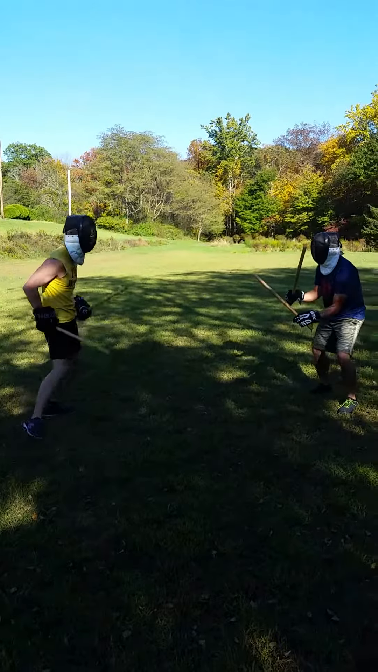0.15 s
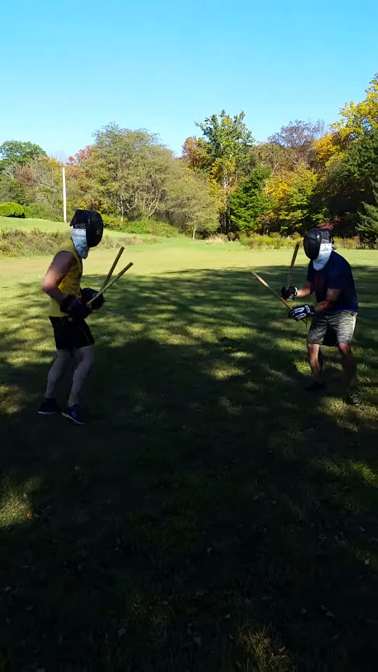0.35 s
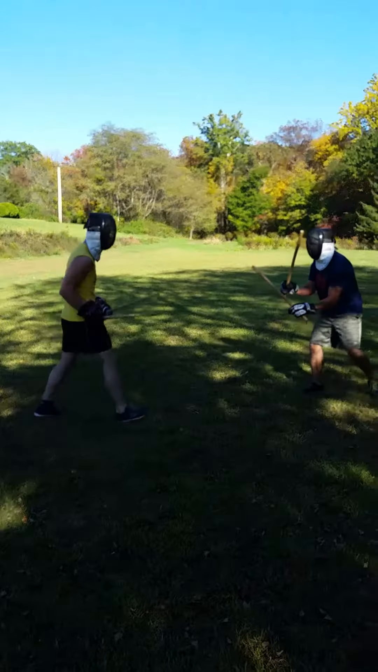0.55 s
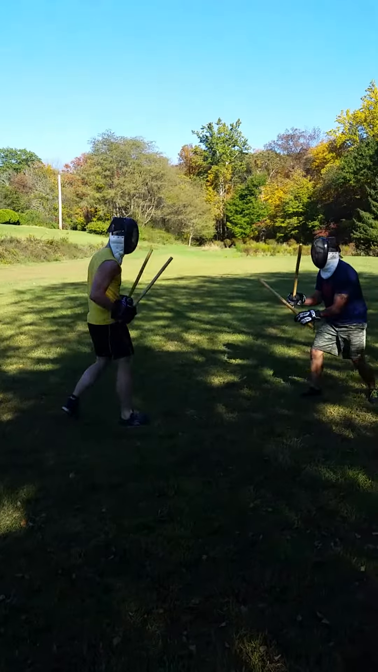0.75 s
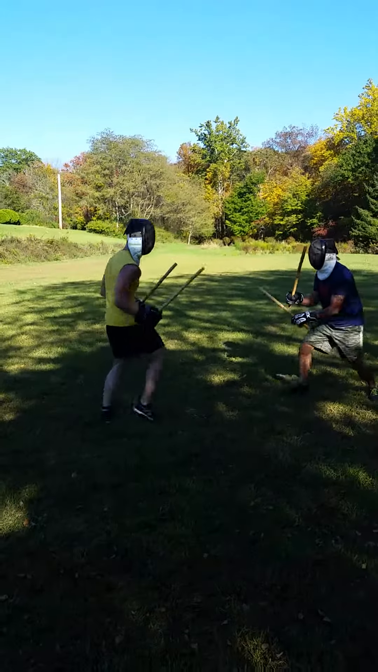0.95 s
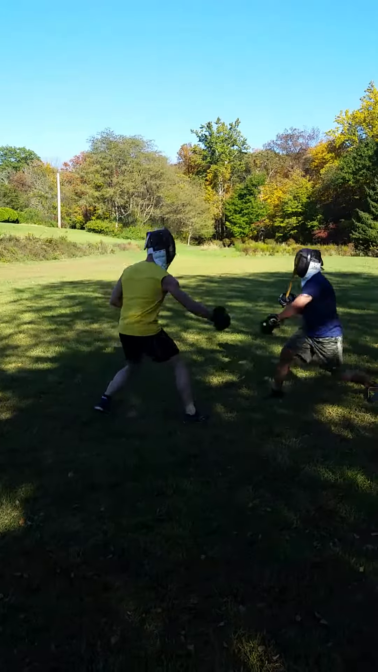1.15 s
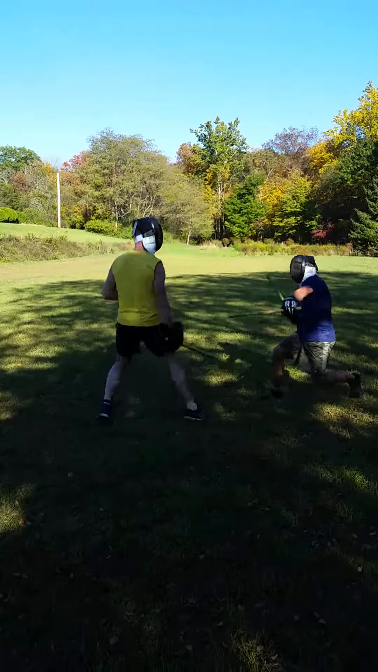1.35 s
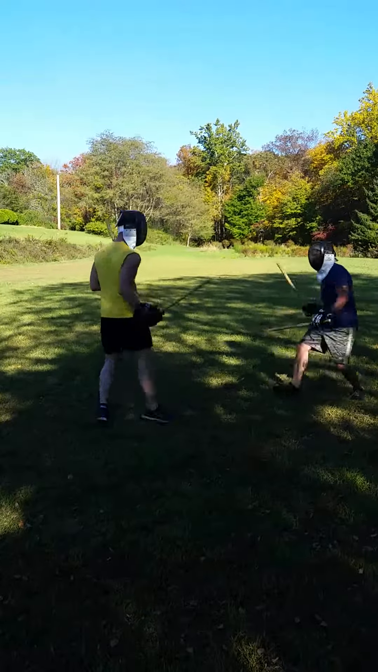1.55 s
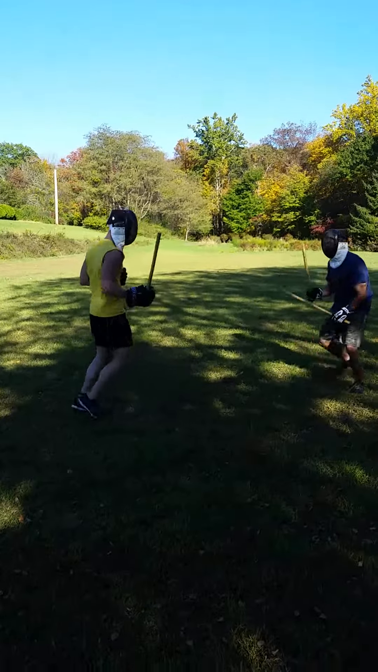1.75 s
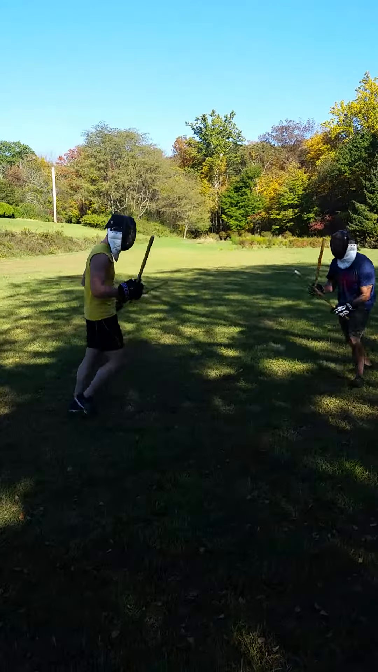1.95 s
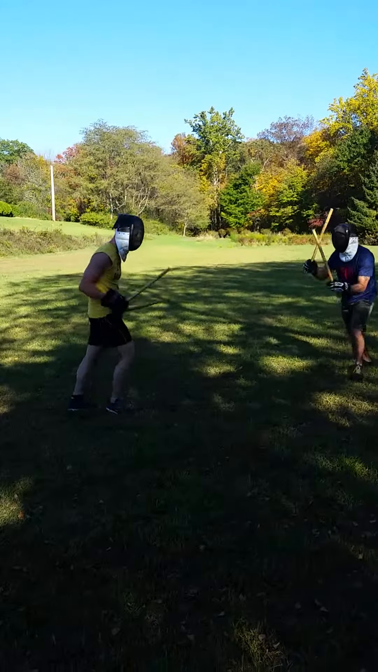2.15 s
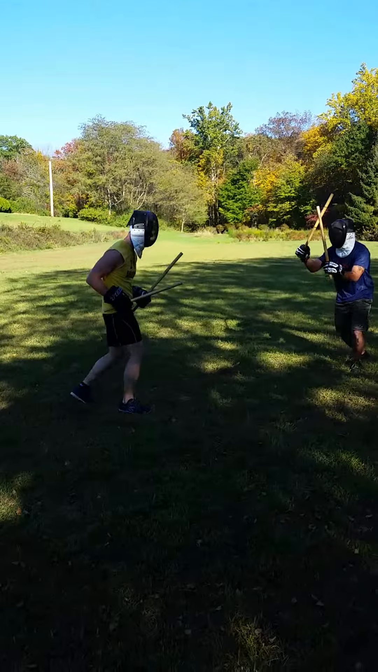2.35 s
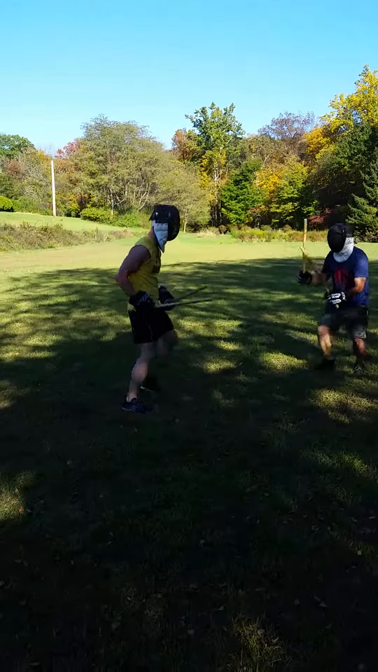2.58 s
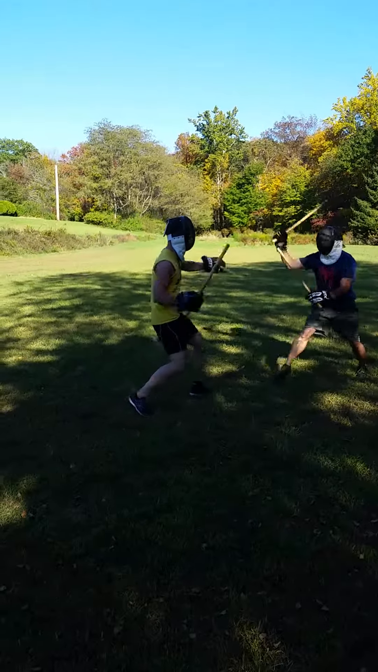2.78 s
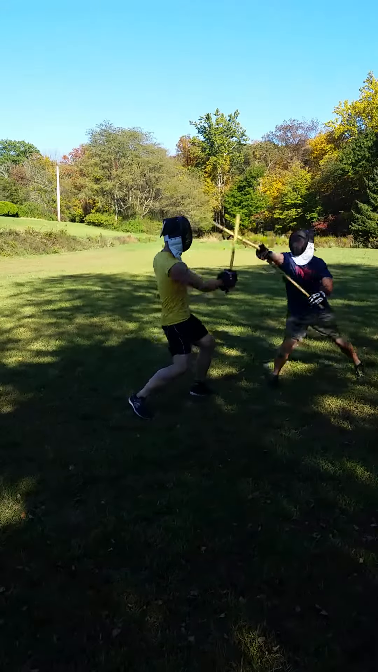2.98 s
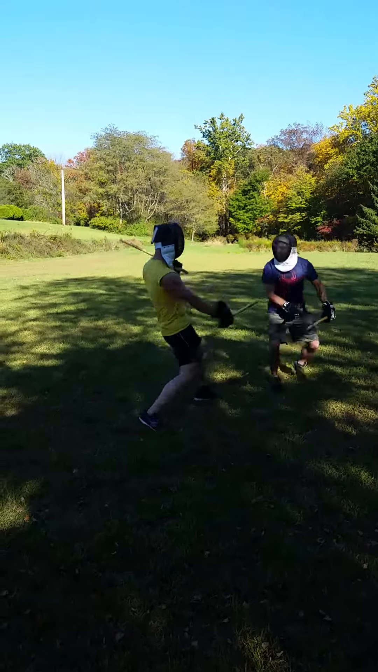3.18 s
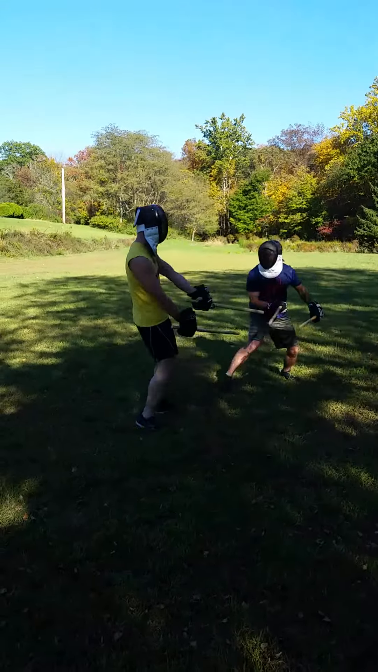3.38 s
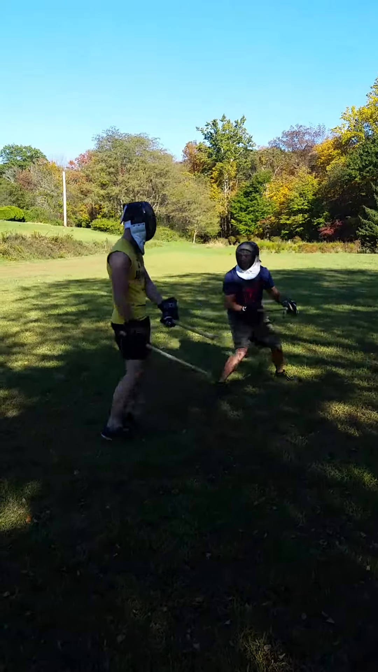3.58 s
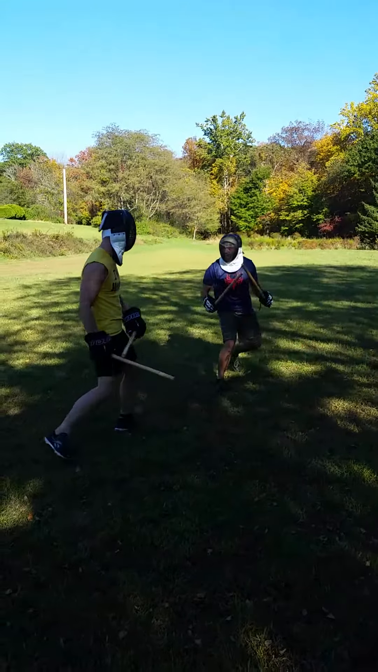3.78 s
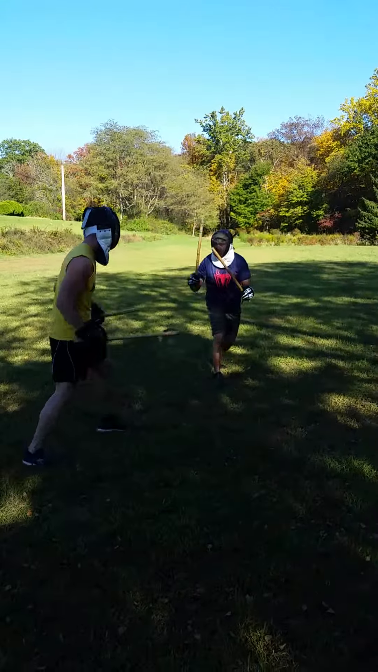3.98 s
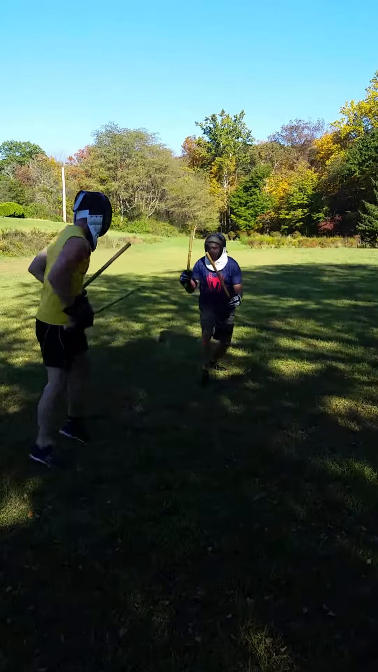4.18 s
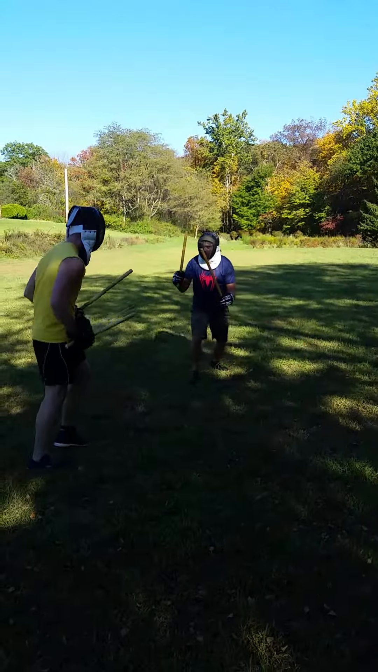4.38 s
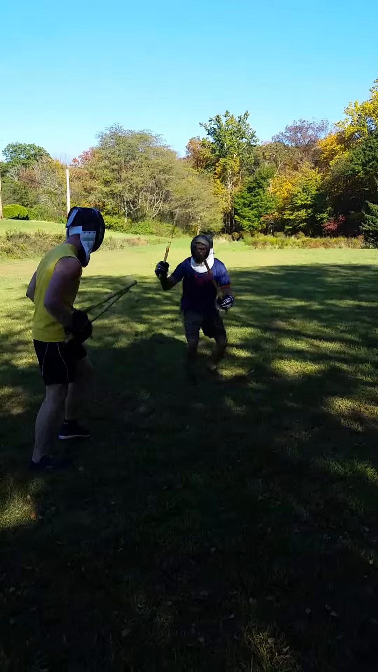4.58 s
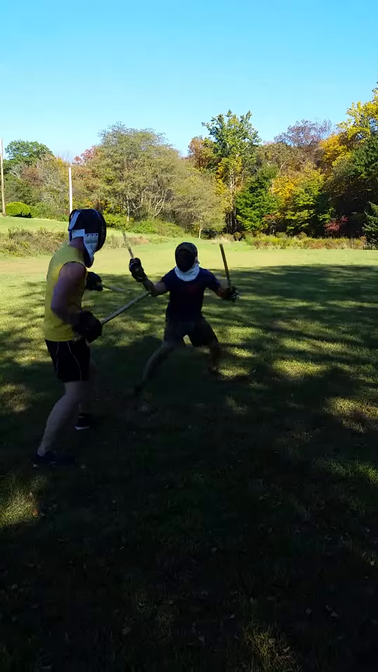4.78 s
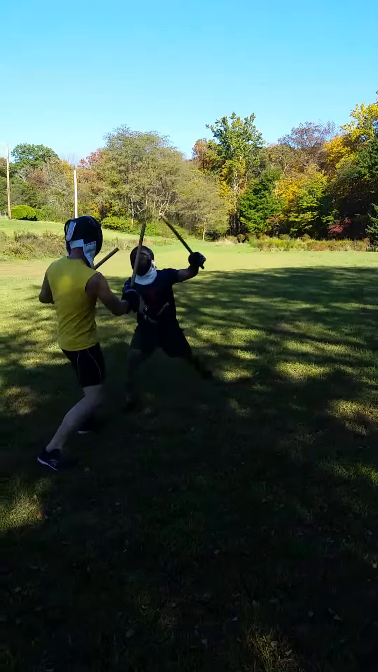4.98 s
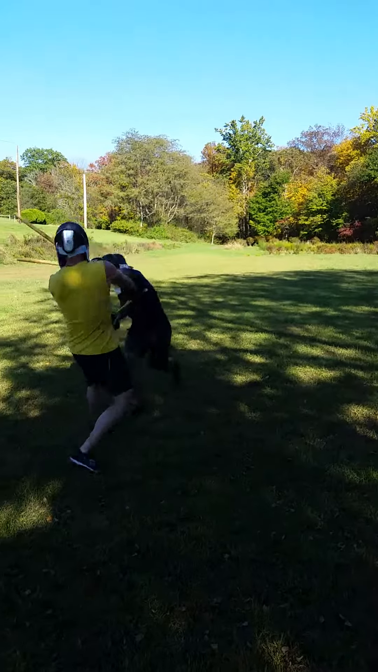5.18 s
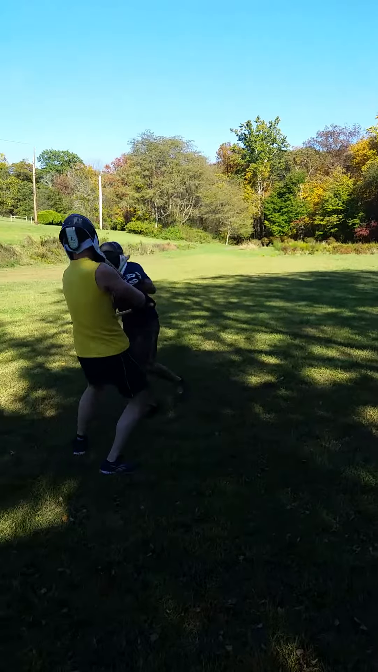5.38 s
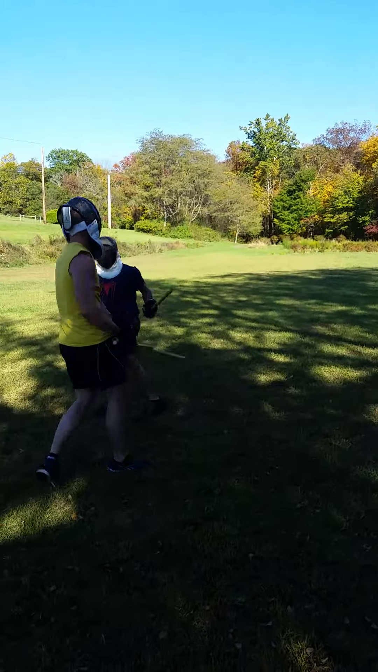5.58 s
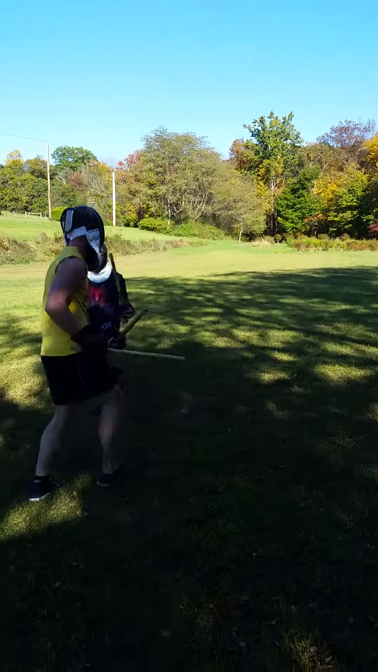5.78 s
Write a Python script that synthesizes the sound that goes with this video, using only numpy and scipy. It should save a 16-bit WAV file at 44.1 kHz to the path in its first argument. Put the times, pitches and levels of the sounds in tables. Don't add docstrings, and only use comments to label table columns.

```python
import sys
import numpy as np
from scipy import signal
from scipy.fft import rfft, irfft
from scipy.io import wavfile
from scipy.ndimage import uniform_filter1d

SR = 44100
rng = np.random.default_rng(int(sys.argv[2]) if len(sys.argv) > 2 else 0)


def gain_from_db(level_db):
    decades = np.asarray(level_db, float) / 20
    return 10 ** decades


def unload_wav(signal):
    wavfile.write(
        sys.argv[1],
        SR,
        np.round(np.clip(np.atleast_2d(signal).T, -1, 1) * 32767).astype(np.int16),
    )


N = 257544

# start_s, level_db, tilt_db_per_octave (hardness), favoured_hz (place of contact), near_echo_db
STICK_BLOWS = [
    (1.288, -11.5, -0.1, 3770, -13.5),
    (3.133, -25.5, 0.5, 4420, -19),
    (4.982, -12.5, -1.1, 2300, -9),
    (5.011, -15.5, -0.5, 3920, -7),
    (5.191, -23.5, 0.5, 1330, -12),
    (5.281, -16.5, -1.4, 3900, -14),
    (5.433, -19, -1.5, 704, -18),
]
LONG_STICK_BLOWS = [
    (3.093, -13.5, 1.5, 1170, -9),
    (3.474, -16.5, -2, 2240, -18),
    (4.707, -29, -6.5, 1360, -22),
    (5.311, -29.5, -2.5, 1620, -24),
]
GLOVE_BLOWS = [
    (1.332, -15.5, 0.89, 730, -23.5),
    (1.397, -30.5, -1.1, 1700, -12),
]
# start_s, level_db, snap_db, rise_ms, pitch_factor (on TOUCH_MODES)
TOUCHES = [
    (0.986, -47.5, -17, 1.1, 0.52),
    (1.208, -58, -2, .7, 0.95),
    (2.944, -48.5, -8, 0.3, 1.42),
    (3.529, -39.5, -36, 2.4, 1.02),
    (3.925, -49.5, -23.5, 0.74, 1.02),
    (4.05, -66, -15, 0.55, 1.4),
    (4.686, -41.5, -19, 1.7, 0.38),
    (5.042, -33, -26, 0.7, 0.79),
]
# pitch_hz, width_hz, level_db
STICK_MODES = [(230, 68, -21), (695, 67, -3), (1200, 110, -2.5), (1658, 200, -0.5), (2233, 120, 0.5),
               (2890, 100, -2), (3380, 250, -9.5), (3840, 54, -3.5), (4390, 110, -8), (4568, 120, -10.5),
               (5135, 130, -12.5), (5815, 100, -15)]
LONG_STICK_MODES = [(634, 68, -10), (1070, 91, -5.5), (1620, 58, -3), (2300, 280, -11.5), (2870, 140, -4),
                    (3110, 110, -5), (3730, 160, -4), (4350, 190, -7.5), (5080, 100, -5), (5930, 89, -14),
                    (7100, 95, -15.5)]
GLOVE_MODES = [(228, 44, -4.5), (728, 85, -2.5), (1247, 110, -6), (1700, 150, -14.5), (2320, 200, -12.5),
               (3150, 130, -16), (4150, 600, -11.5)]
TOUCH_MODES = [(1190, 130, 9), (1590, 460, -11), (2040, 95, 12), (3100, 350, 8), (4000, 69, -0.5),
               (5100, 990, -8)]
# pitch_hz, level_db
CONTACT_NOISE = [(200, -16), (1000, -2.5), (4000, 9), (8500, 2.5), (10000, -13.5), (15800, -14.5),
                 (16500, -34.5)]
# pitch_hz, t60_s
TREE_DECAY = [(300, 0.88), (1000, 1), (2200, 1), (4000, 0.89), (8000, 0.78)]
# pitch_hz, level_db
NEAR_TREES = [(150, -27.5), (500, -7.5), (2000, -3.5), (4500, -1.5), (9000, -20), (16000, -43)]
FAR_TREES = [(150, -18), (700, -5.5), (2200, -2), (4000, -7.5), (6000, -18), (16000, -41)]
# start_s, length_s, level_db, centre_hz, spread_octaves
SCUFFS = [(0.611, .2, -56.5, 1093, 0.12), (0.0, 0.3, -55.5, 1070, 0.88), (0.958, .05, -57.5, 1190, 2.15),
          (1.148, 0.098, -62, 4710, 0.92), (2.28, 0.11, -65.5, 5960, 1.74), (2.285, .18, -61, 1345, 0.3),
          (2.685, 0.28, -58.5, 5200, 1.04), (2.746, 0.14, -44.5, 770, 0.9),
          (3.698, 0.23, -65.5, 8000, 0.58), (4.642, 0.15, -57.5, 1000, 1.9), (5.434, 0.13, -54, 5240, 0.58),
          (5.555, 0.3, -54, 1160, 0.57)]
# start_s, peak_db, pitch_hz, t60_s,
# edge_db
LEFT_THUMPS = [(0.768, -33.5, 54.5, 0.084, -4), (1.005, -38, 71, 0.13, -23), (1.235, -32.5, 117, 0.2, -34),
               (2.2, -32, 112, .08, -11.5), (3.094, -32.5, 337, 0.055, -28.5),
               (3.475, -31, 337, 0.042, -37), (4.69, -39.5, 72, 0.082, -30), (4.98, -14, 350, 0.03, -33),
               (5.065, -21, 93, 0.043, -23), (5.191, -25.5, 266, 0.046, -4), (5.288, -20.5, 245, 0.025, -3),
               (5.445, -27.5, 230, 0.06, -20)]
RIGHT_PUSHES = [
    (0.975, -23.5, 91.4, 0.13, -41),
    (1.398, -22.5, 92, 0.027, -1),
    (2.128, -17.5, 73.4, 0.14, -45),
    (2.2, 0.5, 65.5, 0.11, -1),
    (2.69, -19.5, 104, 0.074, -24),
    (3.556, -22.5, 84, 0.21, -24),
    (3.572, -16, 85, 0.12, -1.5),
    (5.289, -17.5, 123.6, 0.069, -25),
    (5.365, -28.5, 112, 0.15, -22),
]
RIGHT_PULLS = [
    (5.3155, -8.5, 90, 0.083, -14.5),
    (5.4535, -5, 97, 0.073, -53),
]
# time_s, level_db
GUSTS = [(0.0, -43.5), (0.99, -40), (1.22, -45.5), (1.59, -43), (1.87, -48.5), (2.41, -41.5), (2.98, -39),
         (3.43, -49.5), (4.13, -45.5), (4.28, -38), (4.63, -35), (5.3, -42), (5.59, -44), (5.84, -43)]
# pitch_hz, level_db
WIND = [(10, -4.5), (30, 4.5), (70, 6.5), (110, -1.5), (200, -25.5), (300, -39), (600, -73.5)]
COVER = [(100, -7.5), (300, -6), (480, -18), (800, -9.5), (1500, -22), (2500, -23.5), (4000, -40.5),
         (6000, -55.5), (16000, -53.5)]
# start_s, length_s, pitch_hz, pulses_per_s, level_db
NEAR_INSECT = (4.3, .46, 4040, 33.3, -55)
# pitch_hz, width_hz, level_db
INSECTS = [(3987, 710, -54), (4330, 1100, -60), (8000, 880, -69.5)]
# pitch_hz, level_db
BREEZE = [(20, -35.5), (60, -38.5), (110, -40.5), (200, -44), (500, -48.5), (1000, -53.5), (2000, -60),
          (2900, -65), (6000, -71), (8000, -69), (10000, -81)]
# time_s, level_db
ENGINE_FADE = [(0, 4.5), (2.8, 2), (3.3, 2), (5.84, -3.5)]
# pitch_hz, level_db
HISS = [(20, -47), (300, -45.5), (1000, -56), (2000, -63), (4000, -71.5), (6500, -85), (10000, -82),
        (12000, -72.5), (15700, -68.5), (16050, -100)]
# time_s, level_db
GAIN = [(0.0, -77.5), (0.86, -85), (1.19, -78), (2.08, -84), (2.83, -80), (3.03, -80), (3.25, -92.5),
        (4.1, -91), (4.26, -87), (4.39, -86), (4.91, -80.5), (5.27, -83.5), (5.51, -81.5), (5.84, -83)]


def evened(x):
    return x / np.sqrt(np.mean(x ** 2) + 1e-20)


def read(points, hz):
    f, value = np.transpose(points)
    return np.interp(np.log(hz + 1), np.log(f + 1), value)


def curve(table):
    time_s, level_db = np.transpose(table)
    return np.interp(np.arange(N) / SR, time_s, level_db)


def add(mix, start_s, sound):
    part = mix[round(start_s * SR):][:len(sound)]
    part += sound[:len(part)]


def decay(t, t60_s):
    return gain_from_db(-60 * t / t60_s)


def rise(t, rise_s):
    return 1 - np.exp(-t / rise_s)


def colour(x, points, size=4096):
    log_gain = np.log(gain_from_db(read(points, abs(np.fft.fftfreq(size, 1 / SR)))))
    taps = np.fft.ifft(np.exp(np.conj(signal.hilbert(log_gain)))).real
    return signal.oaconvolve(x, taps[:size // 2])[:len(x)]


def wander(rate_hz):
    hz = np.fft.rfftfreq(N, 1 / SR)
    return evened(irfft(rfft(rng.standard_normal(N)) / (1 + (hz / rate_hz) ** 4), N))


def patches(shape, bands, frames):
    across = uniform_filter1d(rng.standard_normal(shape), size=bands, axis=0)
    return evened(uniform_filter1d(across, size=frames, axis=1))


def noise(points, patchy_db):
    hz, t, z = signal.stft(rng.standard_normal(N), SR, nperseg=1024)
    z = z * gain_from_db(patchy_db * patches(z.shape, 14, 6))
    return colour(signal.istft(z, SR, nperseg=1024)[1][:N], points)


def crack(blow_db, snap_db, rise_ms, modes, phases):
    t = np.arange(2600) / SR
    slow = max(rise_ms / 1000, 1e-4)
    ring = np.zeros(len(t))
    for (hz, width_hz, db), phase in zip(modes, phases):
        width_hz = np.clip(width_hz, 120, 700)
        ring += gain_from_db(db) * np.exp(-np.pi * width_hz * t) * np.sin(2 * np.pi * (hz * t + phase))
    ring = ring * rise(t, slow)
    chatter = rng.standard_normal(400) * (rng.random(400) < .03) * gain_from_db(-9.5) * decay(t[:400], 0.045)
    ring = signal.oaconvolve(ring, np.r_[1, chatter])[:len(t)]
    ring = ring / abs(ring).max()

    quick = max(rise_ms / 2000, 1e-4)
    snap = colour(rng.standard_normal(len(t)) * decay(t, 0.025) * rise(t, quick), CONTACT_NOISE)
    body = [(150, -29)] + [(hz, db) for hz, width_hz, db in modes] + [(7500, -34.5)]
    fill = colour(rng.standard_normal(len(t)) * decay(t, 0.047) * rise(t, slow), body)
    fill = fill / abs(fill).max()
    return gain_from_db(blow_db + 5.0) * (ring + gain_from_db(-8.5) * fill + gain_from_db(snap_db + 5.5) * snap)


def trees(points, start_s, swell_s):
    hz, t, z = signal.stft(rng.standard_normal(SR), SR, nperseg=256)
    bushes_db = 2.6 * patches(z.shape, 9, 5)
    z = z * gain_from_db(bushes_db) * decay(t, read(TREE_DECAY, hz)[:, None])
    tail = signal.istft(z, SR, nperseg=256)[1][:SR]
    swell = np.clip((np.arange(SR) / SR - start_s) / swell_s, .05, 1) ** 1.15
    tail = colour(tail * swell, points)
    return tail / np.linalg.norm(tail)


def echoes(near, near_db):
    far_db = -21 + 0.27 * (near_db + 13.5)
    return gain_from_db(near_db + 5.0) * near + gain_from_db(far_db) * trees(FAR_TREES, 0.017, 0.2)


def blows(table, body):
    out = np.zeros(N)
    hz, width_hz, mode_db = np.transpose(body)
    chances = rng.random((len(table), 2, len(body)))
    for (start_s, level_db, tilt, favoured_hz, near_db), (phases, grip) in zip(table, chances):
        favour_db = 7.5 * np.exp(-(np.log2(hz / favoured_hz) / 0.3) ** 2)
        tilt_db = tilt * np.log2(hz / 2010)
        modes = list(zip(hz, width_hz, mode_db + favour_db + tilt_db - 1.5 * grip))
        rise_ms = 0.48 * gain_from_db(0.9 * max(-16.5 - level_db, 0))
        blow = crack(level_db, -20.5 + 1.25 * tilt, rise_ms, modes, phases)
        near = trees(NEAR_TREES, 0.0095, 0.036) * decay(np.arange(SR) / SR, 0.52)
        add(out, start_s, blow)
        add(out, start_s, np.linalg.norm(blow) * echoes(near, near_db))
    return out


def touches():
    out = np.zeros(N)
    chances = rng.random((len(TOUCHES), 10))
    for (start_s, level_db, snap_db, rise_ms, pitch), phases in zip(TOUCHES, chances):
        modes = np.multiply(TOUCH_MODES, [pitch, 1, 1])
        add(out, start_s, crack(level_db, snap_db, rise_ms, modes, phases))
    return out


def sticks():
    hard = blows(STICK_BLOWS, STICK_MODES) + blows(LONG_STICK_BLOWS, LONG_STICK_MODES)
    return hard + blows(GLOVE_BLOWS, GLOVE_MODES) + touches()


def scuffs():
    out, hz = np.zeros(N), np.geomspace(50, 20000, num=120)
    for start_s, length_s, level_db, centre_hz, octaves in SCUFFS:
        count = round(length_s * SR)
        grains = rng.standard_normal(20000) * gain_from_db(2.0 * rng.exponential(1, 20000))
        band_db = np.maximum(-6 * (np.log2(hz / centre_hz) / octaves) ** 2, -60)
        rubbing = evened(colour(grains, np.c_[hz, band_db])[-count:])
        stroke = np.interp(np.linspace(0, 1, count), [0, 0.33, 1], [0, 1, 0])
        add(out, start_s, gain_from_db(level_db) * rubbing * np.sin(np.pi / 2 * stroke) ** 2)
    return out


def thumps(table):
    out, t = np.zeros(N), np.arange(9000) / SR
    for start_s, peak_db, hz, t60_s, edge_db in table:
        turns = hz * (t + 0.0048 * rise(t, 0.0014))
        ring = np.sin(2 * np.pi * turns) * decay(t, t60_s) * rise(t, 0.006)
        edge = gain_from_db(edge_db) * np.sin(2 * np.pi * 165 * t) * decay(t, 0.033) * rise(t, 0.0043)
        add(out, start_s - .0006, gain_from_db(peak_db + 2.5) * (ring + edge))
    return signal.sosfilt(signal.butter(2, 800, fs=SR, output="sos"), out)


def wind_rumble():
    return evened(noise(WIND, 2.4)) * gain_from_db(curve(GUSTS) + 9.5 + 2.2 * wander(21.6))


def singer():
    start_s, length_s, hz, rate, level_db = NEAR_INSECT
    t = np.arange(N) / SR - start_s
    swell = np.sin(np.pi * np.clip(t / length_s, 0, 1)) ** .6
    pulses = np.sin(np.pi * (rate * t - 0.17 + 0.04 * wander(12))) ** 4
    loudness = gain_from_db(level_db + 1.5 * wander(30))
    whistle = np.sin(2 * np.pi * np.cumsum(hz + 35 * wander(68)) / SR)
    return loudness * swell * pulses * whistle


def insects():
    hz = np.geomspace(2000, 12000, num=200)
    bands = sum(gain_from_db(db) / (1 + (2 * (hz - f_hz) / width_hz) ** 2) for f_hz, width_hz, db in INSECTS)
    return noise(np.c_[hz, 20 * np.log10(bands)], 0.55) * gain_from_db(4.5 + 1.1 * wander(60))


def breeze():
    return noise(BREEZE, 1.0) * gain_from_db(1.5)


def engine_hum():
    waver_db, waver_hz = 1.5 * wander(7), 3 * wander(8)
    return gain_from_db(-56 + curve(ENGINE_FADE) + waver_db) * np.sin(2 * np.pi * np.cumsum(127 + waver_hz) / SR)


def scene():
    ride_db = curve(GAIN) + 81
    gain = gain_from_db(ride_db)
    air = sticks() + scuffs() + singer()
    air += breeze() * gain_from_db(0.6 * ride_db) + insects() * gain_from_db(1.14 * ride_db)
    wind = wind_rumble()
    hum = engine_hum()
    left_hiss = gain_from_db(1.5) * noise([(8000, -99.0)] + HISS[-4:], 1.2)
    left = air + gain * (hum + left_hiss) + thumps(LEFT_THUMPS) + gain_from_db(-43.0) * wind
    right = colour(air, COVER) + gain * noise(HISS, 0.46) + wind
    right += thumps(RIGHT_PUSHES) - thumps(RIGHT_PULLS)
    return np.array([left, right])


def low_pass(x):
    return signal.sosfilt(signal.butter(12, 16800, fs=SR, output="sos"), x)


def record(dry):
    edge = signal.butter(14, 16100, fs=SR, output="sos")
    mix = signal.sosfilt(edge, dry) - 0.0005
    return low_pass(mix)


dry = scene()
out = record(dry)
unload_wav(out)
```